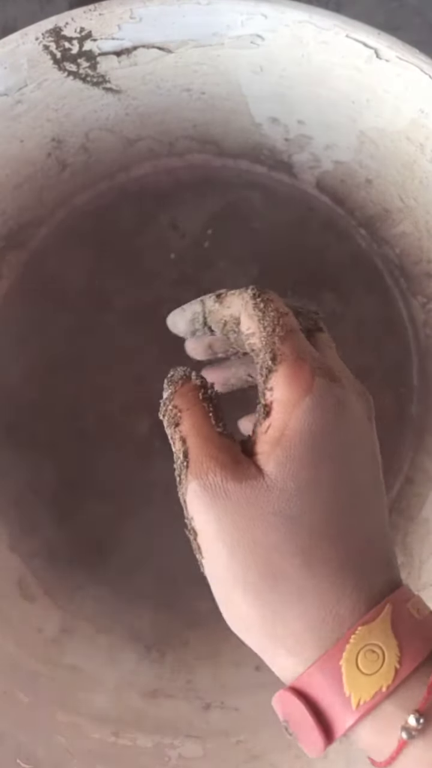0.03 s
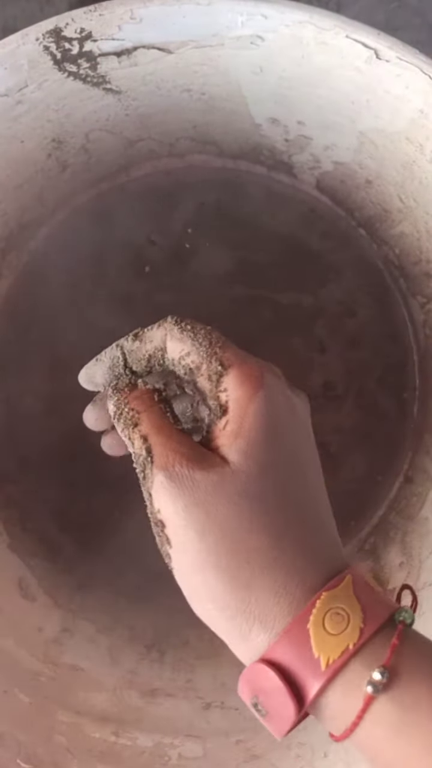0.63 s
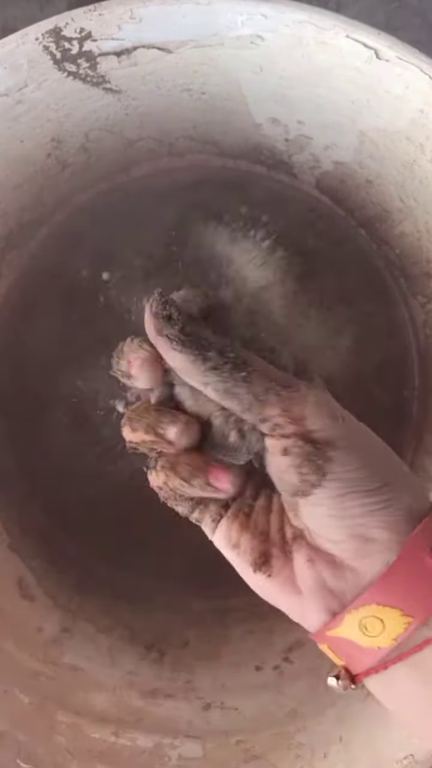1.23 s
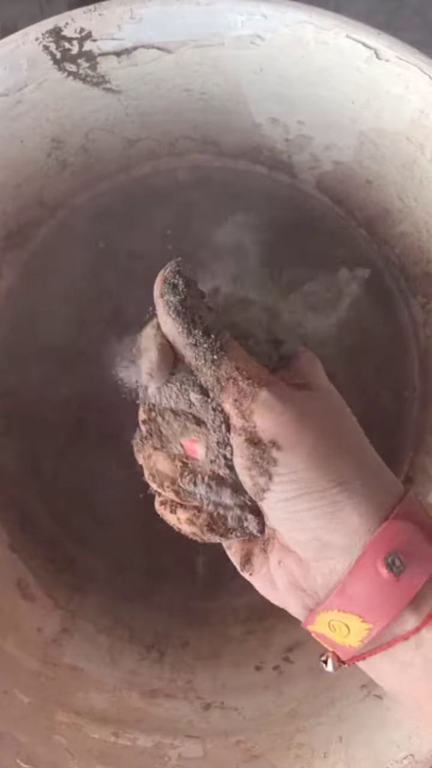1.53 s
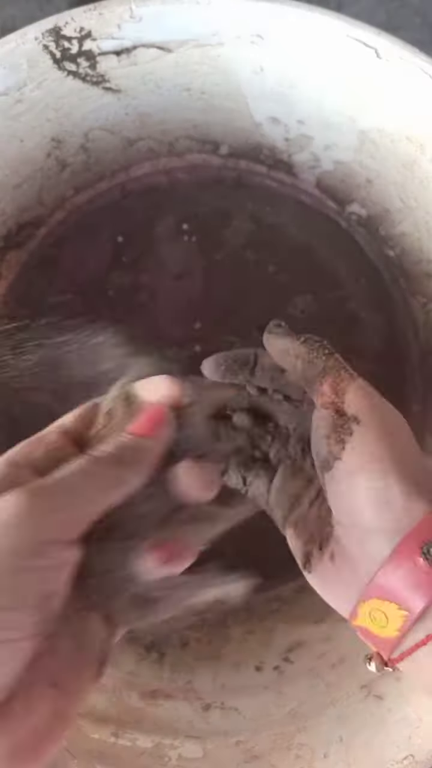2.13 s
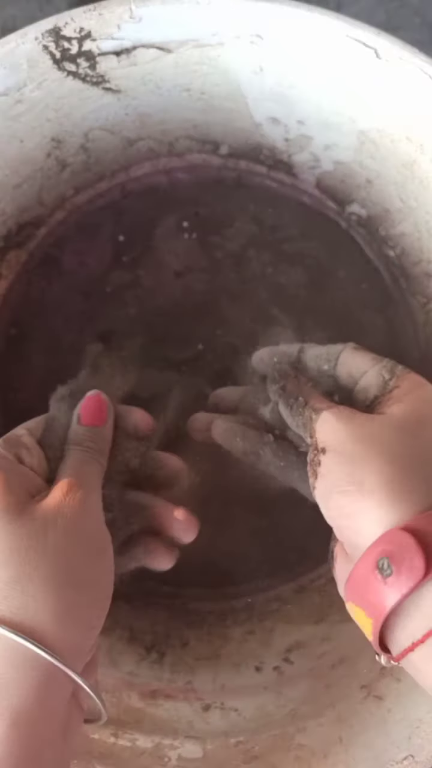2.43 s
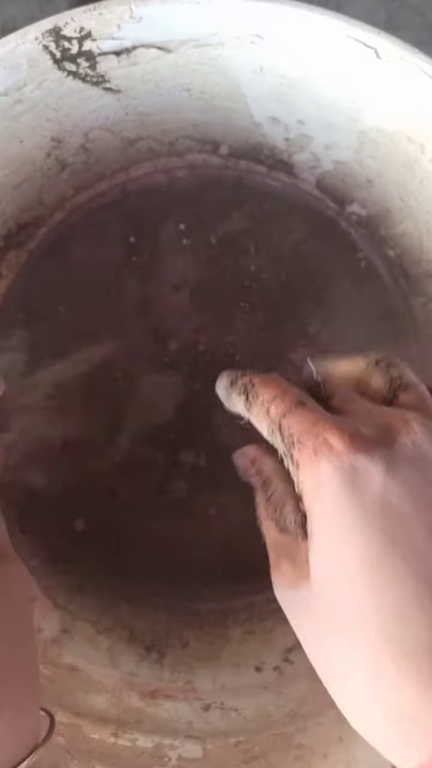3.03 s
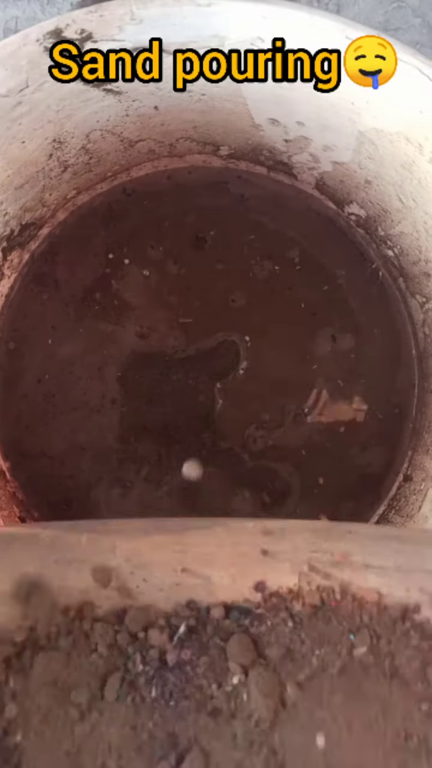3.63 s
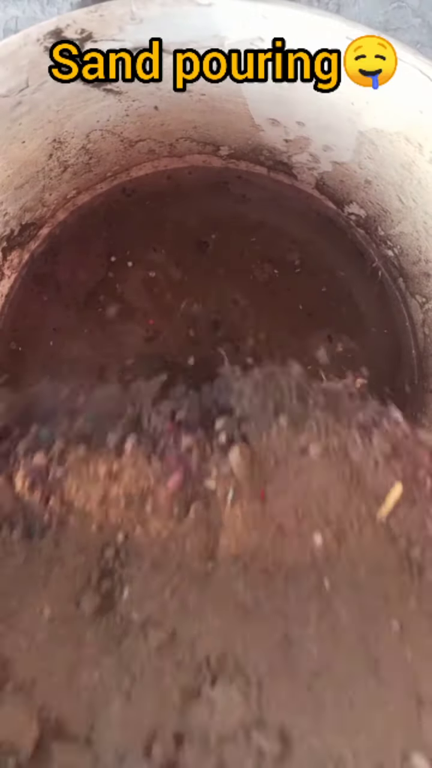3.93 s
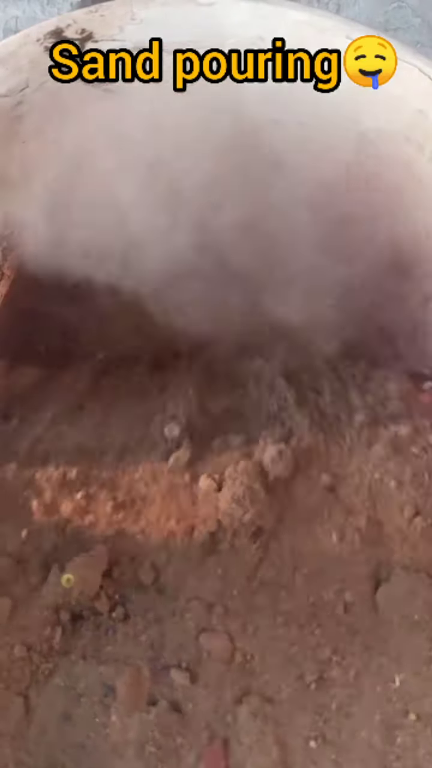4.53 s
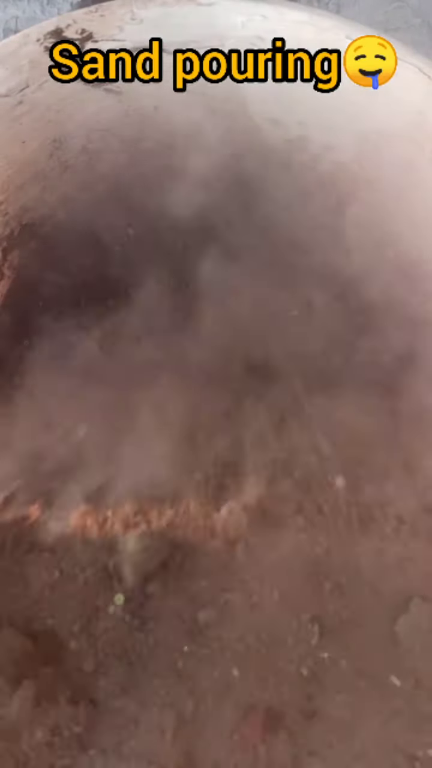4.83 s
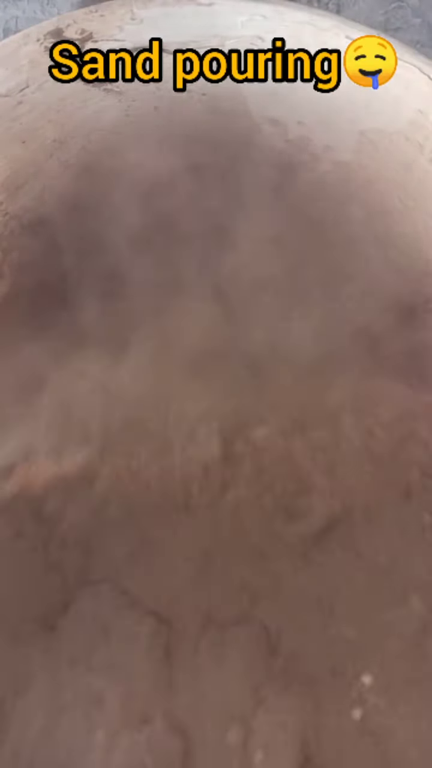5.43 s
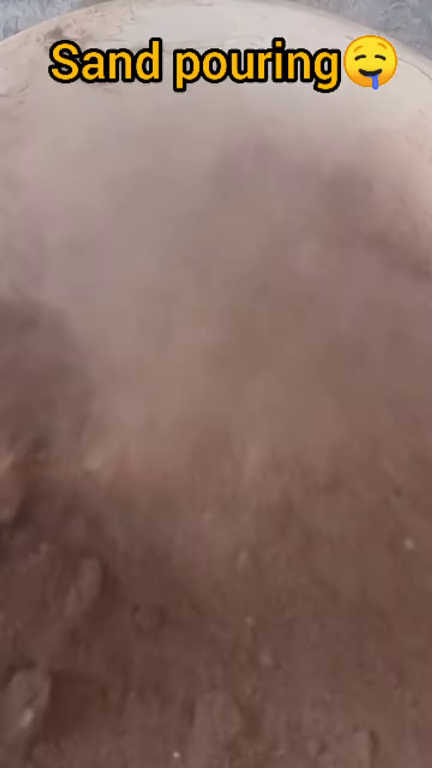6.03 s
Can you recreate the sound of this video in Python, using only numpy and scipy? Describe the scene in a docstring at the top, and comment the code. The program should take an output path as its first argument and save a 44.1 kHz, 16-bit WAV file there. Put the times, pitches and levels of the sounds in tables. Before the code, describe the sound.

The scene is outdoors, with a faint low murmur throughout and a few distant bird chirps and a soft hoot in the first second. From about 0.9 to 3.1 seconds, hands close to the microphone crumble dry sand in quiet, uneven rustles with small crisp snaps. A plastic tub is bumped dully at about 2.1 and 2.6 seconds. At 3.1 the rustling stops and sand hisses down a tipped pan. From 3.5 to 3.9 a very loud volley of clods knocks hollowly into the tub, overloading the microphone. A rush of falling soil follows, strongest around 4 seconds, then easing into a grainy hiss with low drumming. From 4.3, lumps thud softly on the heap, growing heavier after 5.6. Flying grit ticks sharply against the microphone from about 4.1, thickest and loudest from 5.8 until the end at around 6.3 seconds.

```python
"""Dry sand rustles and snaps as hands crumble it over a plastic tub with water in the bottom, outdoors,
after a few far bird chirps. A pan of soil is tipped in: sand slides and hisses, and a volley of clods
rings the tub's modes and overloads the microphone. Later lumps thud softly on the heap while flying
grit ticks on the microphone's housing."""
import sys
import numpy as np
from scipy import signal
from scipy.fft import rfft, irfft
from scipy.io import wavfile

SR = 44100
rng = np.random.default_rng(int(sys.argv[2]) if len(sys.argv) > 2 else 0)


def file_out(sig):
    """Save sig as 16-bit WAV at sys.argv[1]."""
    # one column per channel
    cols = np.atleast_2d(sig).T
    # limit, then scale
    lim = np.clip(cols, -1, 1)
    pcm = np.round(lim * 32767).astype(np.int16)
    wavfile.write(sys.argv[1], SR, pcm)


N = 277389
TIME = np.arange(N) / SR
SLIDE_START_S = 3.14   # the scene changes: hand rustle stops abruptly, hiss of sliding sand begins
POUR_S = 3.85   # soil stream reaches the tub

# tub modes: (frequency [Hz], gain [dB], t60 before extra treble decay [s])
TUB_MODES = [(76.9, -20, 0.29), (204.8, -25.5, 0.28), (326.6, -4, 0.086), (345, -12, 0.15),
             (395, -11.5, 0.09), (464, -5.5, 0.031), (529, -13, 0.082), (610, -10, 0.013),
             (643, -12, 0.024), (820, -13, 0.18), (836.5, -13.5, 0.089), (880, -6, 0.035),
             (972, -11, 0.055), (1135, -10.5, 0.033), (1206.5, -12.5, 0.11), (1297, -10, 0.096),
             (1470, -16, 0.052), (1721, -18.5, 0.27), (2141, -10.5, 0.061), (2174, -14, 0.38),
             (2620, -15, .025), (2939, -13, 0.11), (3120, -13.5, 0.053), (3720, -8, 0.051),
             (3977, -17, 0.16), (4020, -12.5, 0.024)]
# hiss of the finest grains: (frequency [Hz], gain [dB])
FINE_SPECTRUM = [(3500, -23.5), (4900, -8), (7000, 0), (12000, -1), (16000, 1)]
# large grit on the housing: (time [s], relative level [dB], ring [Hz], fizz trim [dB])
GRIT_HITS = [(4.1368, -7, 5260, -40), (4.1934, -9.5, 6950, -11), (4.2033, -16, 5600, 7),
             (4.448, -11.5, 7700, 0), (4.4689, -8, 4290, 0), (4.5175, -12, 5500, -3),
             (4.5694, -2, 5825, -16), (4.5945, -15, 4130, 2), (4.641, -3, 5160, -19),
             (4.6762, 1, 5160, -20), (4.743, -12.5, 5630, -12), (5.3932, -11, 5900, -0.5),
             (5.4429, -2.5, 6640, 4.5), (5.46, -10, 6100, 3), (5.8268, 3.5, 5470, -15),
             (5.837, -5.5, 5970, 6.5), (5.841, -4.5, 4860, 6), (5.875, 1.5, 4120, -13),
             (5.9174, -1.5, 5670, -10), (5.9932, -7.5, 6100, 1), (6.006, -4, 4400, -9),
             (6.0432, -13, 5240, -2), (6.07, 11.5, 6200, -26), (6.0854, -7.5, 4500, -30),
             (6.105, -3.5, 4520, -12), (6.1244, 6.5, 5500, -21), (6.1615, -3.5, 5600, -14),
             (6.172, 2.5, 5630, -8), (6.203, -3.5, 5130, -28)]


def from_db(db):
    """Decibels to gain."""
    return 10 ** (np.asarray(db) / 20)


def rms_one(x):
    """Scale to rms 1."""
    return x / np.sqrt(np.mean(x ** 2) + 1e-20)


def add(out, s, sound):
    """Mix a short sound in at time s."""
    at = max(int(round(s * SR)), 0)
    out[..., at:at + sound.shape[-1]] += sound[..., :max(N - at, 0)]


def cut(x, hz, kind, order=2):
    """Butterworth low- or high-pass."""
    return signal.sosfilt(signal.butter(order, np.clip(hz, 10, .45 * SR), kind, fs=SR, output="sos"), x)


def colour(x, spectrum):
    """Minimum-phase filter from a table of (frequency [Hz], gain [dB])."""
    size = 16384
    hz, db = np.transpose(spectrum)
    bins_hz = np.maximum(np.fft.rfftfreq(size, 1 / SR), 1)
    gain = from_db(np.interp(np.log(bins_hz), np.log(hz), db))
    cepstrum = irfft(np.log(gain), size)
    cepstrum[1:size // 2] *= 2
    cepstrum[size // 2 + 1:] = 0
    response = irfft(np.exp(rfft(cepstrum)), size)
    return np.apply_along_axis(signal.fftconvolve, -1, x, response)[..., :N]


def drift(rate_hz):
    """Random wander, rms 1."""
    return rms_one(np.interp(TIME * rate_hz, np.arange(4000), rng.standard_normal(4000)))


def swell(s, length_s, attack_s, release_s):
    """Gain: linear rise from time s, hold, exponential decay after length_s."""
    return np.clip((TIME - s) / attack_s, 0, 1) * np.exp(-np.maximum(TIME - s - length_s, 0) / release_s)


def ring(force, hz, t60_s):
    """One damped mode driven by a force."""
    r, w = from_db(-60 / (t60_s * SR)), 2 * np.pi * hz / SR
    return signal.lfilter([0, np.sin(w)], [1, -2 * r * np.cos(w), r * r], force + 1e-18)


def grains(per_s, spread_db, clump_db):
    """Random grain impacts, uneven in size, level fluctuating in clumps; rms 1."""
    sizes = from_db(spread_db * np.minimum(rng.exponential(1, N), 5)) * rng.choice([-1, 1], N)
    hits = rng.random(N) < per_s / SR
    return rms_one(sizes * hits * from_db(clump_db * drift(120)))


def outdoors():
    """Steady low murmur of air and far traffic, plus faint hiss."""
    # noise spectra: (frequency [Hz], gain [dB])
    murmur_spectrum = [(35, -65), (60, 0.5), (128, -7), (233, -15), (281, -6), (318, -10.5), (460, -31.5),
                       (589, -24.5), (667, -28), (790, -23), (894, -35), (1140, -29.5), (2400, -57),
                       (3120, -94), (5280, -120)]
    hiss_spectrum = [(1000, -27), (2200, -7), (4500, -2), (7000, -7), (12000, -2.5), (16000, -2.5)]
    murmur = from_db(-47) * rms_one(colour(rng.standard_normal(N), murmur_spectrum))
    hiss = from_db(-67) * rms_one(colour(rng.standard_normal(N), hiss_spectrum))
    return murmur + hiss


def far_calls(notes, fall, waver, echo_db, echo_s):
    """Near-sine notes sag in pitch; wall reflections smear them."""
    out = np.zeros(N)
    for s, length_s, hz, db in notes:
        progress = np.linspace(0, 1, int(length_s * SR))
        pitch_hz = hz * (1 + fall * (1 - progress) ** 3 + waver * drift(146)[:len(progress)])
        tone = np.sin(2 * np.pi * np.cumsum(pitch_hz) / SR)
        add(out, s, from_db(db) * np.sin(np.pi * progress) * tone)
    tail = rng.standard_normal(SR // 2) * np.exp(-TIME[:SR // 2] / echo_s)
    return out + from_db(echo_db) * signal.fftconvolve(out, tail / np.linalg.norm(tail))[:N]


def birds(chirp_s=0.063, chirp_db=-60.5):
    """Distant chirps and a faint hoot."""
    # chirps: (time [s], pitch [Hz])
    chirps = [(0.02, 2800), (0.18, 2870), (0.311, 2970), (0.456, 2850), (0.585, 2890), (0.735, 2950),
              (0.89, 3060)]
    # hoot notes: (time [s], length [s], pitch [Hz], level [dB])
    hoots = [(0.44, 0.194, 587, -55), (0.75, 0.21, 610, -68)]
    notes = [(s, chirp_s, hz, chirp_db) for s, hz in chirps]
    chirping = far_calls(notes, fall=0.042, waver=0.017, echo_db=0, echo_s=0.14)
    return chirping + far_calls(hoots, fall=0.0094, waver=0.003, echo_db=-2, echo_s=0.081)


def tub(force, upper_decay_db_per_s_per_hz=0.13):
    """Tub modes ring from one force, or one row per mode; those above 1.5 kHz die away faster."""
    out = np.zeros(N)
    for push, (hz, db, t60_s) in zip(np.broadcast_to(force, (len(TUB_MODES), N)), TUB_MODES):
        decay_db_per_s = 60 / t60_s + upper_decay_db_per_s_per_hz * hz * (hz > 1500)
        out += from_db(db) * ring(push, hz, 60 / decay_db_per_s)
    return out


def sand(impacts, spectrum, body_gain, treble_gain, tub_db, treble_db):
    """Grain stream heard directly and through the tub; the finest grains hiss on top."""
    ringing = rms_one(tub(cut(impacts, 850, "high", order=3)))
    rush = rms_one(rms_one(colour(impacts, spectrum)) + from_db(tub_db) * ringing)
    hiss = from_db(treble_db) * rms_one(colour(impacts, FINE_SPECTRUM))
    return body_gain * rush + treble_gain * hiss


def crumbling(sag_db_per_s=8, crackle_db=5, crackle_hz=5500):
    """Fingers rub off grains; each squeeze swells, then sags as the lump gives way. Some grains crack."""
    # squeezes: (time [s], length [s], rustle level [dB], treble trim [dB])
    squeezes = [(0.904, 0.28, -64, -12), (1.064, 0.18, -58.5, -10), (1.205, 0.21, -46, -12),
                (1.356, 0.64, -51, -12.5), (1.51, 0.25, -50.5, -12), (1.875, 0.25, -56.5, -7),
                (2.21, 0.21, -47, -12.5), (2.32, 0.2, -44.5, -15.5), (2.562, 0.3, -52, -11),
                (2.727, 0.15, -46, -11.5), (2.894, 0.22, -51, -13)]
    # rustle of sand in the hand: (frequency [Hz], gain [dB])
    rustle_spectrum = [(240, -1.5), (400, 2.5), (693, -21), (821, 3), (912, -8), (1850, -8), (2950, -7),
                       (4550, -9.5), (5000, -49), (6500, -42), (11000, -120)]
    impacts = grains(per_s=2700, spread_db=0, clump_db=2.5)
    rubbing = TIME < SLIDE_START_S
    body_power, treble_power = rubbing * from_db(-64) ** 2, rubbing * from_db(-80) ** 2
    for s, length_s, db, trim_db in squeezes:
        sag_db = sag_db_per_s * np.maximum(TIME - s, 0)
        effort = from_db(db - sag_db) * swell(s, length_s, attack_s=0.15, release_s=0.041)
        body_power += effort ** 2
        treble_power += (effort * from_db(trim_db)) ** 2
    body_gain, treble_gain = np.sqrt(body_power), np.sqrt(treble_power)
    cracks = rms_one(cut(grains(per_s=65, spread_db=1, clump_db=-4), crackle_hz, "high"))
    rustle = sand(impacts, rustle_spectrum, body_gain, treble_gain, tub_db=-9.5, treble_db=14)
    return rustle + from_db(crackle_db) * treble_gain * cracks


def crumbs(level_db=-2, snap_s=0.0047):
    """Crumbs snap in the hand or drop into the tub: a noise burst and a short pitched ring."""
    # snaps: (time [s], relative level [dB], pitch [Hz], burst re ring peak [dB])
    snaps = [(0.924, -55, 3050, 13.5), (1.307, -36, 2920, -19), (1.334, -32, 1760, -2),
             (1.4202, -37, 4630, 3.5), (1.4527, -37, 3230, -27), (1.516, -30.5, 3800, -28),
             (1.5773, -42, 2470, -7), (1.636, -41, 2520, 6), (1.662, -30, 2870, -26),
             (1.863, -40, 3100, -21), (1.945, -33.5, 3230, -31), (2.272, -35, 4220, -14),
             (2.5348, -37, 3720, -19), (2.633, -33.5, 3640, -19), (2.7335, -40, 7600, -1),
             (2.7696, -34, 4200, -4), (2.7948, -32.5, 4340, -6), (2.818, -22.5, 2440, -22),
             (2.8256, -25.5, 2370, -19), (2.8492, -37, 2670, 12), (3.198, -19.5, 3500, -8.5),
             (3.2313, -20.5, 3580, -12), (3.3732, -28, 3550, -2), (4.9258, -32.5, 2060, -6),
             (5.072, -33, 4400, -2), (5.2652, -31.5, 3940, -9)]
    out, t = np.zeros(N), TIME[:SR // 25]
    for s, db, hz, burst_db in snaps:
        burst = cut(rng.standard_normal(len(t)), 1170, "high") * np.exp(-t / snap_s)
        tone = ring(burst, hz, t60_s=.008)
        add(out, s, from_db(db + level_db) * (tone / np.abs(tone).max() + from_db(burst_db) * burst))
    return out


def landings(shatter_hz=1850, lump_hz=308, softening_hz_per_s=24, lump_share=0.12):
    """Clod and lump impacts as (time [s], strength [dB], contact cut-off [Hz], share that crumbles)."""
    # hard clods on the tub: (time [s], strength [dB], contact cut-off [Hz])
    hard_clods = [(2.003, -37, 990), (2.821, -38.5, 5000), (3.423, -33.5, 700), (3.5618, -2.5, 1210),
                  (3.6, 2.5, 637), (3.628, -1, 2400), (3.637, 4.5, 670), (3.657, -2.5, 2800),
                  (3.672, -1.5, 1930), (3.692, -5, 1980), (3.703, 2, 1510), (3.724, -9, 2180),
                  (3.735, -1.5, 2580), (3.760, -1.5, 1890), (3.786, -3, 1550), (3.805, -3, 950),
                  (3.820, -1.5, 1450), (3.829, 1, 1510), (3.851, -4, 900), (4.195, -27.5, 700),
                  (5.145, -32, 770), (5.2425, -34.5, 1490)]
    # soft lumps on the heap: (time [s], strength [dB])
    soft_lumps = [(4.322, -24), (4.356, -27), (4.543, -31), (4.732, -26), (4.8224, -20.5), (4.8557, -18),
                  (5.0511, -21), (5.091, -25), (5.185, -26), (5.331, -25.5), (5.609, -22), (5.643, -19.5),
                  (5.6819, -14), (5.744, -18), (5.865, -14), (5.936, -12.5), (6.063, -13), (6.2, -13.5)]
    # ten smaller clods tumble between the big ones
    tumble = [(3.675 + 0.0145 * (k + late), -8, 1310 * 2 ** (hardness - .5))
              for k, (late, hardness) in enumerate(rng.random((10, 2)))]
    hard = [(s, db, hz, min(hz / shatter_hz, 1)) for s, db, hz in list(hard_clods) + tumble]
    # contacts soften as the heap grows
    soft = [(s, db, lump_hz - softening_hz_per_s * (s - POUR_S), lump_share) for s, db in soft_lumps]
    return hard + soft


def clods(slap_db=4, slap_hz=1700, crack_db=13, fragment_s=0.0055):
    """Each landing is one push plus fragments; soft lumps push slowly and wake only the low modes."""
    burst_force, mode_forces, t = np.zeros(N), np.zeros((len(TUB_MODES), N)), TIME[:SR // 25]
    upper = np.array(TUB_MODES)[:, :1] > 380
    for s, db, contact_hz, share in landings():
        fragments = rng.standard_normal(len(t)) * np.exp(-t / fragment_s)
        push = share * cut(fragments, 550, "high") / np.linalg.norm(fragments)
        push[0] += 1
        push = from_db(db) * cut(push, contact_hz, "low", order=3)
        add(burst_force, s, push * np.sqrt(share))   # bursts also radiate directly
        # landing spot sets strength and sign of the upper modes
        spot = rng.uniform(.6, 1.4, upper.shape) * rng.choice([-1, 1], upper.shape)
        add(mode_forces, s, push * np.where(upper, spot, 1))
    slap = cut(cut(burst_force, 100, "high"), slap_hz, "low", order=1) * SR / (2 * np.pi * slap_hz)
    crack = cut(burst_force, 2400, "high")
    return tub(mode_forces) + from_db(slap_db) * slap + from_db(crack_db) * crack


def bumps():
    """The tub's wall rumbles when jostled and booms dully when a hand bumps it."""
    # jostling of tub and pan: (time [s], level [dB])
    jostling = [(2.15, -33), (2.45, -52), (2.65, -40), (5.15, -42.5), (5.5, -55), (6.1, -33.5)]
    # wall rumble: (frequency [Hz], gain [dB])
    rumble_spectrum = [(40, -33), (75, 9.5), (125, -5.5), (170, -15), (300, -16), (1000, -75.5)]
    # hand bumps: (time [s], level [dB], pitch [Hz], t60 [s])
    hand_bumps = [(2.141, -22.5, 95, 0.24), (2.151, -20.5, 135, 0.081), (2.629, -27, 88.5, 0.23)]
    jostle = from_db(np.interp(TIME, *np.transpose(jostling), left=-np.inf))
    out = jostle * rms_one(colour(rng.standard_normal(N), rumble_spectrum))
    click = signal.unit_impulse(SR // 3)
    for s, db, hz, t60_s in hand_bumps:
        add(out, s, from_db(db) * cut(ring(click, hz, t60_s), 230, "low"))
    return out


def pouring(slide_db=-35.5, slide_stop_s=0.38, pour_db=1.5, pour_attack_s=0.08, hiss_exponent=1.045):
    """Sand slides down the pan and slows; soil falls as a dense curtain, hissing with the flow."""
    # flow over the pan's lip: (time [s], relative level [dB])
    flow_curve = [(3.89, -34.5), (3.95, -27), (4.08, -32), (4.2, -42.5), (4.47, -46.5), (4.75, -50.5),
                  (4.94, -46.5), (5.02, -54.5), (5.14, -48.0), (5.23, -52.0), (5.42, -43), (5.68, -42.5),
                  (5.84, -47), (6.12, -44), (6.29, -41.5)]
    # sliding sand, falling soil: (frequency [Hz], gain [dB])
    slide_spectrum = [(290, -61), (500, -41), (825, -12.5), (963, -20.5), (1320, -6.5), (1840, -9),
                      (2060, -6), (2620, -7.5), (3340, -3), (4370, -3.5), (5000, -15), (6500, -75),
                      (11000, -120)]
    fall_spectrum = [(240, -56), (400, -20.5), (543, -13.5), (847, -3), (1000, -18), (1250, -6), (2080, -7),
                     (2310, -8.5), (3170, -4), (5000, -8), (6500, -46), (11000, -120)]
    sliding = from_db(slide_db) * swell(SLIDE_START_S, length_s=0.018, attack_s=0.018, release_s=1)
    sliding *= np.exp(-np.maximum(TIME - POUR_S, 0) / slide_stop_s)
    flow = from_db(pour_db + np.interp(TIME, *np.transpose(flow_curve)))
    flow *= np.clip((TIME - POUR_S) / pour_attack_s, 0, 1)
    slide_grains = grains(per_s=22000, spread_db=-0.5, clump_db=2)
    fall_grains = grains(per_s=16000, spread_db=3, clump_db=2)
    slide = sand(slide_grains, slide_spectrum, sliding, sliding, tub_db=-7.5, treble_db=-3.5)
    fall = sand(fall_grains, fall_spectrum, flow, flow ** hiss_exponent, tub_db=-11, treble_db=-1)
    return slide + fall


def drumming(floor_db=-48.5, hum_hz=334, hum_db=-3):
    """The soil's weight drums on the tub and keeps it humming near its main mode."""
    # loose soil slumps off the pan: (time [s], length [s], level [dB])
    slumps = [(3.87, 0.52, -35), (4.455, 0.096, -36.5), (4.736, 0.2, -42.5), (5.034, 0.18, -40),
              (5.52, 0.301, -39.5), (5.887, 0.39, -40)]
    weight = from_db(floor_db) * (TIME > POUR_S)
    for s, length_s, db in slumps:
        weight = np.maximum(weight, from_db(db) * swell(s, length_s, attack_s=0.0085, release_s=0.05))
    patter = grains(per_s=1500, spread_db=4, clump_db=3)
    through_heap = cut(cut(patter, 356, "low", order=4), 240, "high", order=3)
    drum = rms_one(tub(through_heap))
    hum = from_db(hum_db) * rms_one(ring(drum, hum_hz, t60_s=0.32))
    return weight * rms_one(drum + hum)


def showers(low_hz=4700, high_hz=7000, dust_db=-4):
    """Small grit ticks on the housing at five pitches, in a hiss of the finest dust."""
    # grit showers: (time [s], length [s], tick level [dB])
    bursts = [(4.092, 0.32, -47.5), (4.487, 0.24, -46), (5.027, 0.14, -56), (5.34, 0.11, -46.5),
              (5.5, 0.13, -64), (5.898, 0.071, -37.5), (5.994, 0.21, -37)]
    envelope = sum(from_db(db) * swell(s, length_s, attack_s=0.0082, release_s=0.036)
                   for s, length_s, db in bursts)
    ticks = sum(np.gradient(ring(grains(per_s=90, spread_db=2.5, clump_db=3), hz, t60_s=0.0018))
                for hz in np.geomspace(low_hz, high_hz, 5))
    dust = colour(grains(per_s=8000, spread_db=2, clump_db=2), FINE_SPECTRUM)
    return envelope * (rms_one(ticks) + from_db(dust_db) * rms_one(dust))


def grit(ring_db=5, fizz_db=6, fizz_s=0.00027, knock_db_per_octave=-43):
    """Hard grains hit the housing: a knock, a ring of a few cycles and a stereo fizz."""
    out, t = np.zeros((2, N)), TIME[:SR // 100]
    click = signal.unit_impulse(len(t))
    knock = cut(cut(click, 2600, "low"), 120, "high", order=1)
    knock /= np.linalg.norm(knock)
    for s, db, hz, trim_db in GRIT_HITS:
        knock_db = knock_db_per_octave * np.log2(hz / 4320) - 2   # lower-pitched ticks knock louder
        tone = np.gradient(ring(click, hz, t60_s=0.0022 * rng.uniform(0.24, 1.57)))
        tick = from_db(ring_db) * tone / np.linalg.norm(tone) + from_db(knock_db) * knock
        mid, side = cut(rng.standard_normal((2, len(t))) * np.exp(-t / fizz_s), 13000, "high")
        fizz = (mid + .5 * side * [[1], [-1]]) / np.linalg.norm(mid)
        add(out, s, from_db(db) * (tick + from_db(fizz_db + trim_db) * fizz))
    return out


def spray(level_db=-41, ring_hz=6100, cloud_s=0.012):
    """Each piece of grit flies in a cloud of finer grains that tick on the housing around it."""
    power = sum(from_db(db) ** 2 * np.exp(-np.abs(TIME - s) / cloud_s) for s, db, *_ in GRIT_HITS)
    ticks = np.gradient(ring(grains(per_s=1500, spread_db=3, clump_db=4), ring_hz, t60_s=0.0018))
    return from_db(level_db) * np.sqrt(power) * rms_one(ticks)


def scene():
    """All sources centred; only the grit's fizz has width."""
    background = outdoors() + birds()
    handling = crumbling() + crumbs() + bumps()
    soil = pouring() + drumming() + clods()
    housing = grit() + spray() + showers()
    return background + handling + soil + housing


def record(dry, low_cut_hz=123, high_cut_hz=16000):
    """The microphone's port colours the treble and drops deep bass; loud blows clip; the top is cut."""
    # port response, notched near 10 kHz: (frequency [Hz], gain [dB])
    port_response = [(4500, 0.5), (5000, -6.5), (5800, -4.5), (6400, 0), (7500, -8), (7900, -12.5),
                     (8500, -14), (8800, -24), (11400, -24), (11750, -4.5), (16000, -11)]
    heard = cut(colour(dry, port_response), low_cut_hz, "high", order=3)
    clipped = heard / (1 + np.abs(heard) ** 12) ** (1 / 12)
    return signal.sosfilt(signal.ellip(10, .1, 70, high_cut_hz, fs=SR, output="sos"), clipped)


dry = scene()
out = record(dry)
file_out(out)
```